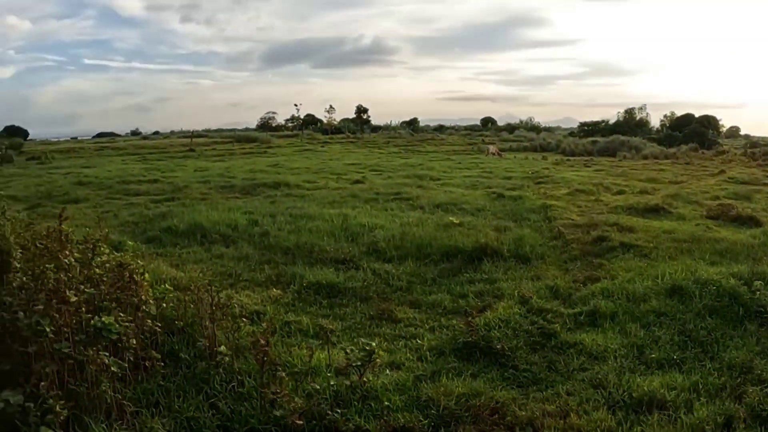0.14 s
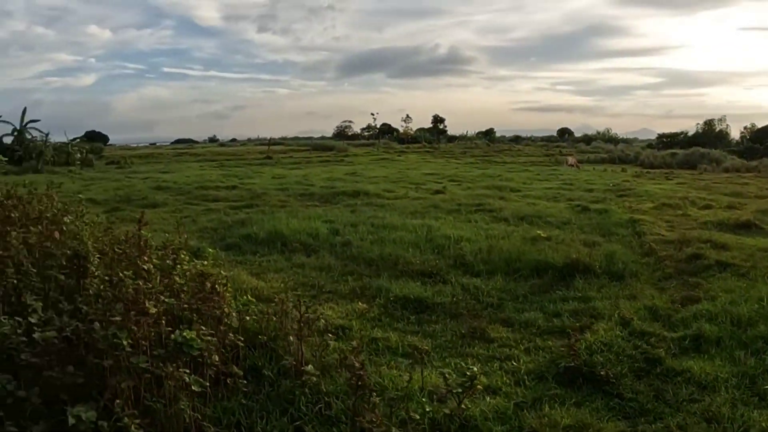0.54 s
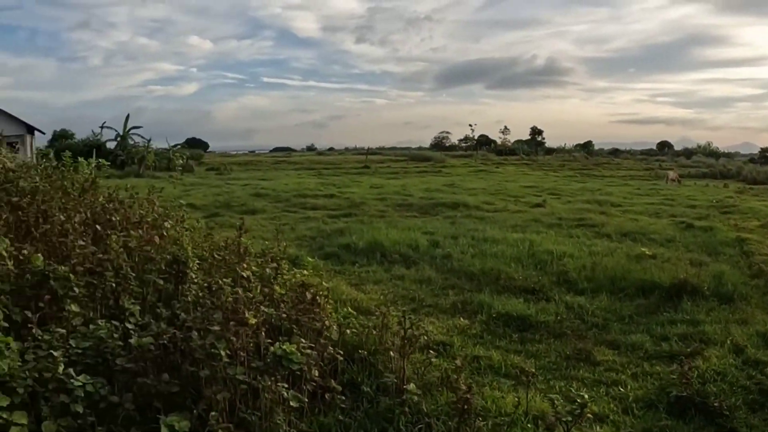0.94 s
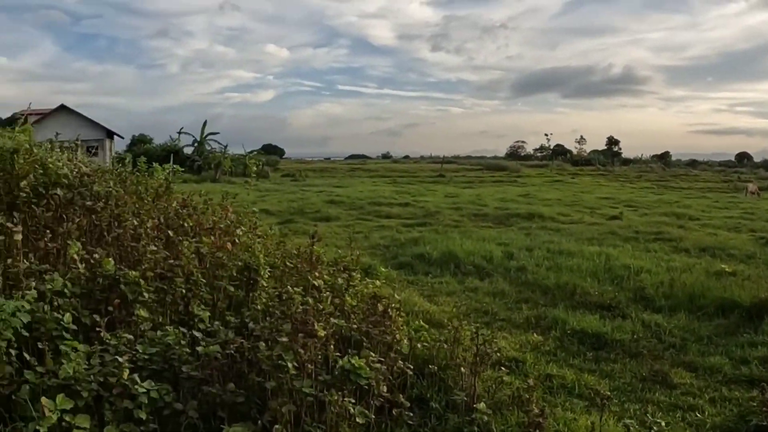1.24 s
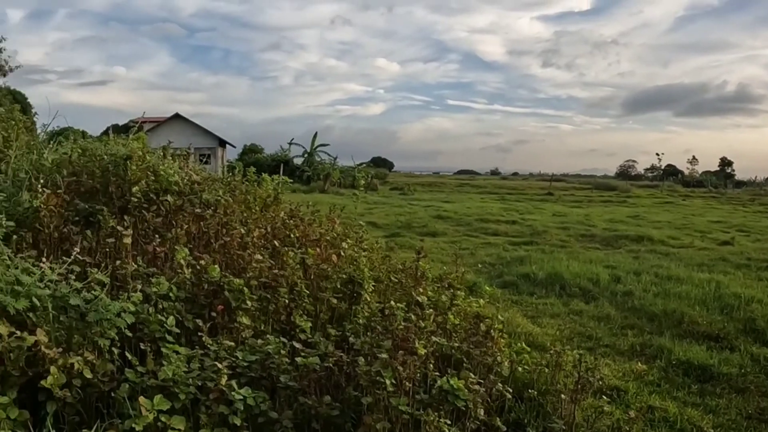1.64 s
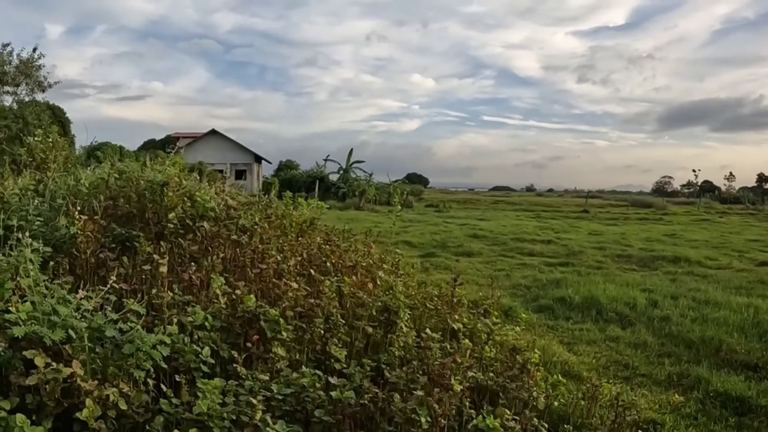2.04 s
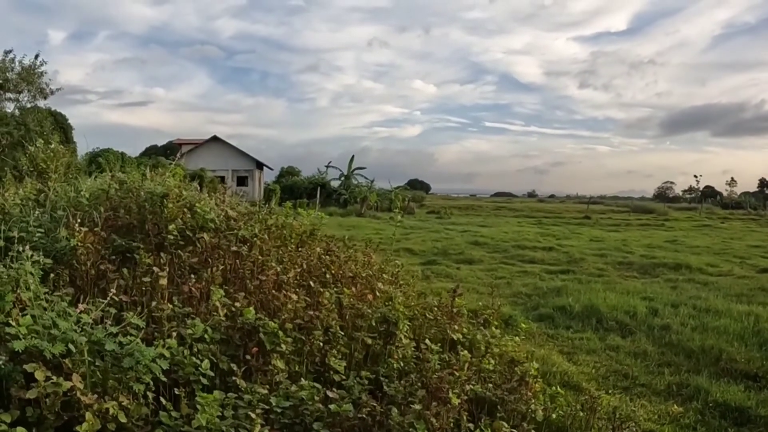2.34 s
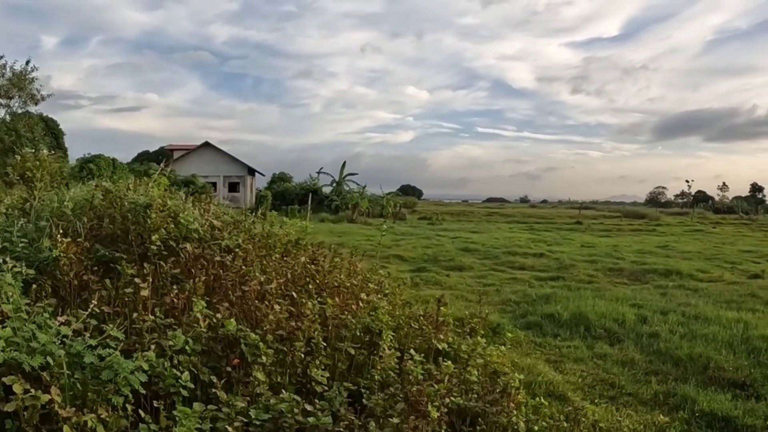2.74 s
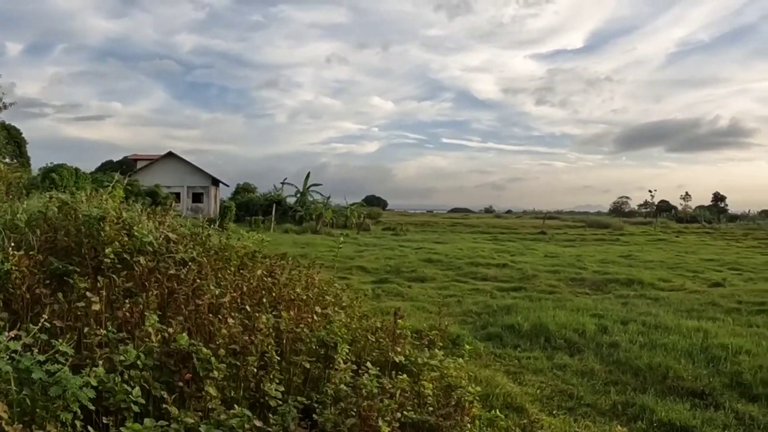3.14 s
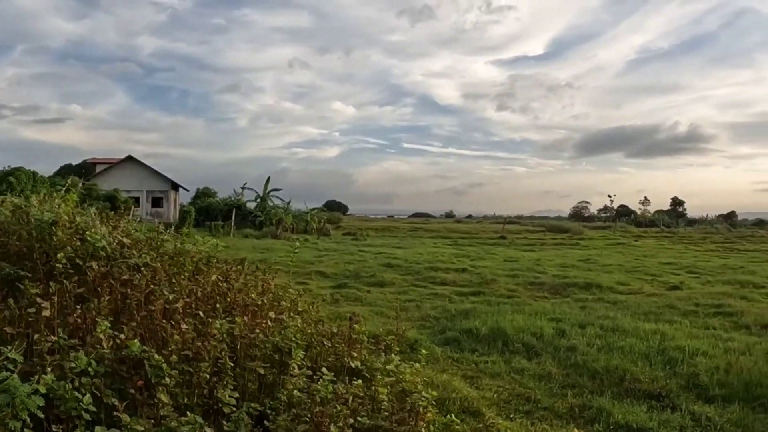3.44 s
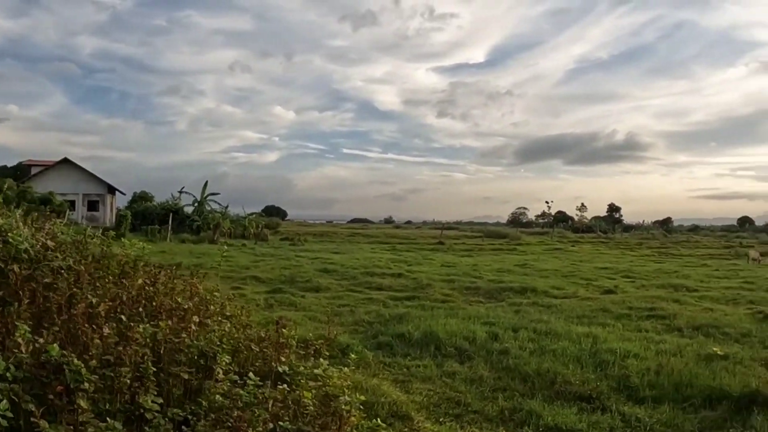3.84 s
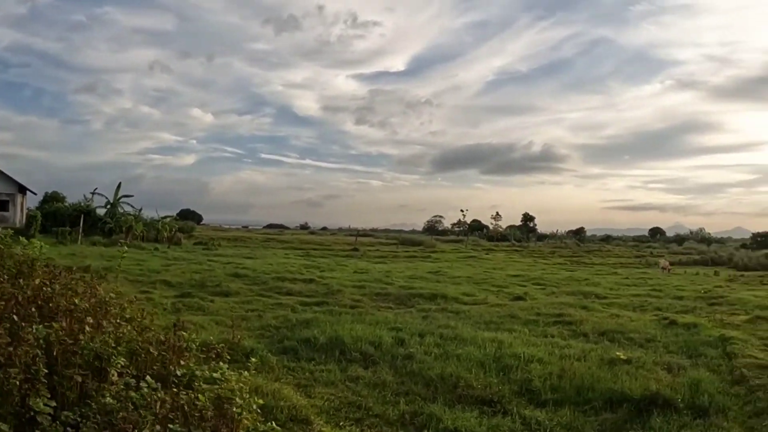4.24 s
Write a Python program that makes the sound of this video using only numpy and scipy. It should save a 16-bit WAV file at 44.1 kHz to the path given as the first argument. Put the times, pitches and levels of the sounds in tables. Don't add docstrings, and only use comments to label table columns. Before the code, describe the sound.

Two diesel engines drone low and rise slowly in pitch beyond a windy pasture, with crickets chirping and metallic knocks in the roar.

```python
import sys
import numpy as np
from scipy import signal
from scipy.io import wavfile
from scipy.ndimage import uniform_filter1d

SR = 44100
rng = np.random.default_rng(int(sys.argv[2]) if len(sys.argv) > 2 else 0)


def voltage_ratio(level):
    return 10 ** (np.asarray(level, float) / 20)


def dump(signal):
    limited = np.clip(np.atleast_2d(signal).T, -1, 1)
    pcm = np.round(limited * 32767).astype(np.int16)
    wavfile.write(sys.argv[1], SR, pcm)


N = 194128
T = np.arange(N) / SR

# [t/s, factor on port lead and unlikeness]
AWAY = [(0, 2.1), (.37, 2.55), (.8, 1.6), (1.2, 1.05), (1.7, 0.63), (2.7, 0.73), (3.0, 1.5), (3.9, 2.65),
        (4.4, 2.8)]
# [f/Hz, left-right likeness 0-1]
SAME = [(60, .99), (400, 0.93), (700, 0.82), (2000, .8), (3000, 0.68), (5000, 0.67), (8000, 0.51),
        (13500, .4)]
# [f/Hz, phase/rad]
LEAD = [(400, -0.062), (700, -.35), (1200, -0.48), (2000, -0.52), (2800, -0.57), (3900, .15), (5200, 0.14),
        (7900, 0.72), (10600, -0.16)]

# [f/Hz, level/dB]
AIR = [(3530, -25), (6000, -4.5), (6740, -10), (7880, -2), (9860, -5.5), (11100, -6), (13100, -10),
       (13600, -16), (13800, -24), (14000, -33)]
AIR_DB = -60.5

# [t/s, gust level/dB]
WIND = [(0, -52), (.5, -46), (.7, -50), (.85, -45), (1.1, -46), (2.0, -46), (2.5, -39.5), (3.0, -44.5),
        (4.4, -44)]
# [f/Hz, level/dB]
RUMBLE = [(15, -5), (30, -0.5), (70, -3), (110, -2.5), (160, -12.5), (250, -23), (400, -34), (600, -43)]
# [f/Hz, level/dB]
EDDIES = [(15, 4), (35, 4), (60, 1), (120, -15), (200, -23), (350, -30), (600, -50)]
EDDY_DB, EDDY_PER_GUST = -53, .3
# [t/s, level/dB, f/Hz, sign and share at the left port (right
POPS = [(.1707, -40, 130, 1), (.33, -39, 50, -1), (.4446, -38, 80, 1), (.53, -37, 50, -1),
        (.5846, -43, 90, 0.92), (1.111, -35, 150, 1), (1.93, -36, 25, -1), (2.05, -31, 18, 1),
        (2.153, -37, 70, -0.79), (2.48, -36, 28, -1), (2.6455, -40, 200, 1), (2.7397, -29, 420, 1),
        (2.7445, -29, 150, -1), (2.799, -37, 150, 1), (2.988, -35, 150, 1), (3.0, -33, 21, -1),
        (3.119, -27, 160, -1), (3.12, -33, 40, -1), (3.3, -30, 19, 1), (3.43, -35, 22, -1),
        (3.96, -36, 25, 1)]
# [t/s, f/Hz, level/dB]
MOAN = [(0, 170, -75), (.36, 165, -57), (.6, 190, -66), (.84, 215, -47), (1.0, 200, -54), (1.25, 200, -47),
        (1.45, 230, -60), (4.4, 230, -75)]

# [t/s, length/s, peak level/dB]
HIGH_CRICKET = [(.314, .14, -62), (.5, .14, -60), (.689, .19, -55), (.925, .05, -53), (1.019, .09, -53),
                (1.16, .19, -54), (1.398, .19, -56), (1.633, .19, -57), (1.918, .19, -57), (2.2, .19, -57),
                (2.433, .09, -58), (2.78, .05, -59), (2.861, .05, -56), (3.004, .19, -54),
                (3.286, .09, -57), (3.72, .09, -60), (3.853, .05, -57), (4.042, .09, -54),
                (4.187, .19, -56)]
LOW_CRICKET = [(.114, .14, -57), (.642, .09, -60), (1.267, .05, -56), (1.315, .05, -51), (1.459, .14, -49),
               (1.652, .05, -50), (1.748, .14, -48.5), (1.989, .19, -49.5), (2.23, .09, -50),
               (2.373, .14, -54), (2.705, .05, -53), (3.2, .14, -56), (3.427, .09, -60), (3.574, .09, -59),
               (4.19, .05, -56), (4.29, .14, -55)]
MID_CRICKET = [(.92, .05, -57), (1.07, .09, -57), (1.207, .19, -57), (2.62, .14, -59), (2.92, .05, -56),
               (3.02, .09, -57), (3.45, .14, -58), (3.73, .09, -58), (3.84, .19, -57)]
# [phrases, f/Hz, chirp period/s, left-right level/dB]
SINGERS = [
    (HIGH_CRICKET, 8410, .0472, 7),
    (LOW_CRICKET, 7860, .0479, 8),
    (MID_CRICKET, 8100, .0485, 6),
]
CHIRP_SPREAD_DB, CHIRP_SPREAD_HZ = 1.0, 15
# [t/s, level/dB]
CHORUS = [(0.0, -70), (0.83, -69), (1.19, -64), (1.49, -63.5), (1.75, -59.5), (2.56, -60.5), (2.81, -62.5),
          (3.92, -64.5), (4.4, -63.5)]

FAST_STROKES = 137.5
# [f/Hz, width/Hz, strokes per s, stroke depth 0-1, left-right level/dB, [t/s, level/dB]]
KATYDIDS = [
    (9550, 800, 190, .3, 2.7, [(0.0, -65), (0.248, -62), (0.75, -72)]),
    (10550, 650, FAST_STROKES, 0.82, 2.9, [(1.1, -84), (1.184, -69), (1.278, -74), (1.55, -67), (1.982, -62.5), (2.64, -64.5)]),
    (11010, 900, 140, 0.27, 7, [(0.0, -67), (0.86, -75), (0.99, -71), (1.56, -75), (1.59, -72), (3.3, -69), (4.4, -65)]),
]
# [t/s, f/Hz, level/dB]
SHRILL = [(0, 14300, -80), (.15, 14450, -79), (.4, 14200, -79), (.69, 14250, -79), (.74, 14300, -100),
          (4.4, 14300, -100)]

# [t/s, level/dB, squeak f/Hz, squeak level over grains/dB]
SCRAPE = [(.915, -60, 2600, -8), (.927, -47.5, 3300, -2), (.95, -52, 4800, -1), (.96, -56, 4700, -10),
          (.972, -48, 4950, 1), (.979, -49, 5900, -6), (.996, -48, 7000, -3), (1.0, -49, 5400, -12),
          (1.03, -50.5, 5200, -16), (1.055, -59, 5000, -14), (1.13, -61, 5300, -8)]
# [f/Hz, level/dB, t60/s, rise/s]
CLICK = [(845, -24, .03, .002), (865, -34, .15, .002), (760, -23, .025, .001), (1700, -31.5, .03, .001),
         (2240, -35, .01, .0003), (3990, -33, .009, .0002), (5200, -37, .008, .0002)]
CLICK_S = 3.1168
# [t/s, level/dB, f/Hz]
TICKS = [(.0197, -46, 3800), (0.0329, -28, 3250), (.0329, -35, 3950), (.0331, -41, 1900), (.034, -39, 3100),
         (.0521, -40, 4230), (.0553, -38, 1700), (.128, -47, 3530), (.925, -41, 5500)]
TICK_TURNS = 1.1

# [t/s, peak level/dB, ring f/Hz]
KNOCKS = [(0.702, -38, 1700), (.774, -38, 1500), (0.919, -31, 1700), (0.9699, -30, 2000),
          (1.329, -36, 1500), (1.438, -35, 1500), (1.592, -37, 1570), (1.678, -35, 1630),
          (1.7211, -28, 2300), (1.792, -27, 1930), (1.815, -35, 1530), (1.883, -35, 1520),
          (1.974, -32, 1500), (1.992, -35, 1850), (2.042, -36, 1780), (2.0823, -28, 1700),
          (2.135, -33, 1920), (2.154, -33, 2370), (2.176, -34, 1810), (2.222, -35, 1510),
          (2.2436, -29, 1820), (2.265, -33, 1520), (2.3328, -32, 1700), (2.351, -35, 1750),
          (2.399, -35, 2070), (2.4196, -28, 2220), (2.439, -34.5, 2170), (2.488, -35, 2170),
          (2.5314, -28.5, 2140), (2.616, -32, 2030), (2.705, -32, 1870), (2.729, -36, 1620),
          (2.859, -36, 1900), (2.9469, -31, 2410), (3.0282, -32, 2020), (3.1155, -35, 2200),
          (3.137, -32, 2450), (3.2217, -29, 2100), (3.328, -33, 2360), (3.4752, -29.5, 2620),
          (3.706, -30, 2020)]
KNOCK_PAN_DB = 1
# [t/s, f/Hz, level/dB]
PANEL = [(0, 1500, -80), (1.5, 1500, -66), (1.75, 1450, -54), (2.0, 1550, -53), (2.2, 1900, -58),
         (2.45, 2250, -52), (2.6, 2100, -56), (2.8, 2000, -72), (4.4, 2000, -80)]

# [t/s, level/dB, load/dB (how much harsher the block rattles)]
ROAR = [(0.0, -46.5, 2.5), (0.37, -45.5, -0.5), (1.04, -41.5, -2), (1.45, -42, -1), (1.75, -41, 0),
        (2.0, -41.5, 0.5), (2.38, -42.5, 4), (2.56, -45, 5.5), (2.76, -43.5, 2.5), (2.98, -44.5, 3.5),
        (3.3, -43.5, 3.5), (3.8, -44.5, 1.5), (4.4, -47.5, -2)]
# [f/Hz, level/dB per Hz]
BODY = [(150, -25), (260, -9), (345, -10), (423, -7), (497, -4), (600, -4), (730, -5.5), (944, -1.5),
        (1280, -4), (1590, -7.5), (2000, -13.5), (2600, -63), (4400, -120)]
BRIGHT = [(880, 1), (1500, -6.5), (2000, 2.5), (2830, -1), (4000, -10.5), (5200, -28), (8800, -120)]
FIZZ = [(2060, -23), (3500, -1), (5130, -2.5), (6520, -9.5), (7200, -7.5), (9360, -39), (15800, -120)]
BRIGHT_DB, BRIGHT_PER_LOAD, FIZZ_DB, FIZZ_PER_LOAD = -8, 1.04, -13.5, 0.94
# [f/Hz, level/dB per Hz]
THRUM = [(190, -8), (260, 0), (350, 0), (450, -1), (560, -1), (660, -9)]
# [t/s, level/dB]
THRUM_LEVEL = [(0, -53), (.5, -53), (.75, -58), (1.0, -56), (1.45, -52), (1.9, -51), (2.3, -52), (2.5, -50),
               (3.5, -49.5), (3.7, -55), (4.4, -54)]
# [t/s, f/Hz, level/dB]
BONNET = [(0, 1200, -60), (.5, 1350, -51), (.95, 950, -51), (1.25, 1120, -50), (1.6, 1130, -49),
          (1.9, 1150, -49), (2.2, 940, -51), (2.5, 1030, -56), (2.77, 970, -47.5), (2.95, 1000, -58),
          (3.7, 1150, -52), (4.4, 1050, -58)]
PAN_DB_PER_AWAY = 4
BLIND_HZ = 270

# [t/s, firing rate f/Hz, effort level/dB]
NEAR = [(0.0, 40.56, 0), (0.275, 41.28, 0), (0.55, 42.26, 2), (0.825, 42.24, -1), (1.1, 42.91, 0),
        (1.375, 43.36, 0.5), (1.65, 43.87, 0), (1.925, 44.42, 0), (2.2, 44.64, 0), (2.475, 45.26, 0),
        (2.75, 45.65, -1), (3.025, 46.45, 0), (3.3, 47.16, 0.5), (3.575, 47.48, 0), (3.85, 48.08, -1),
        (4.125, 48.49, -1), (4.4, 48.78, -2)]
# [multiple of firing rate, main order followed, level under it/dB]
NEAR_ORDERS = [(.5, 0, -26), (.75, 0, -18.5), (1.25, 0, -22), (1.5, 2, -8.5), (1.75, 0, -22),
               (2.25, 0, -45), (2.5, 0, -28), (2.75, 0, -23), (3.25, 2, -19), (4, 2, -18.5), (4.75, 2, -26),
               (5, 0, -34.5), (5.25, 2, -23.5)]
# [f/Hz, level/dB]
NEAR_PIPE = [(45, -24.5), (82, -25.5), (84.5, -26.5), (86, -31.5), (91, -34), (97.5, -44.5), (121, -38.5),
             (127, -40), (131, -36.5), (146, -44)]
# [t/s, firing rate f/Hz, effort level/dB]
FAR = [(0.0, 49.44, -8), (0.275, 54.37, -6), (0.55, 57.12, -5), (0.825, 56.51, -5), (1.1, 56.47, -2),
       (1.375, 57.8, -2), (1.65, 57.64, -4), (1.925, 58.16, -1), (2.2, 58.56, -1), (2.475, 58.93, -3),
       (2.75, 59.27, -2), (3.025, 59.65, -1), (3.3, 60.12, 0.5), (3.575, 60.65, 0), (3.85, 61.13, 0),
       (4.125, 61.59, -1), (4.4, 62.0, 0)]
# [multiple of firing rate, main order followed, level under it/dB]
FAR_ORDERS = [(.5, 0, -11.5), (1.5, 1, -4.5), (2.5, 1, -12), (3.5, 2, -11), (4, 2, -8), (4.5, 2, -14),
              (5, 2, -14.5), (5.5, 2, -17), (6, 2, -19), (6.5, 2, -19), (7, 2, -13), (8, 2, -17),
              (8.5, 2, -19), (9.5, 2, -16)]
# [f/Hz, level/dB]
FAR_PIPE = [(58, -34), (100, -46), (114.5, -46.5), (117, -33.5), (123, -31.5), (170, -55), (174, -46),
            (186, -45)]
OPENING_DB_PER_S, LEVEL_S = 3.5, 3.3
SHED_HZ, SHED_WIDTH_HZ, SHED_DB = 308, 4, 3.5
UNEVEN_LAG, UNEVEN_ORDER = 1.6, .9


def evened(x):
    return x / np.sqrt(np.mean(x ** 2) + 1e-20)


def read(points, hz):
    f, value = np.transpose(points)
    return np.interp(np.log(hz + 1), np.log(f + 1), value)


def curves(rows):
    s, *columns = np.transpose(rows)
    return [np.interp(T, s, c) for c in columns]


def panned(x, db):
    g = voltage_ratio(np.asarray(db) / 2)
    return x * np.array([g, 1 / g]).reshape(2, -1) * 2 / (g + 1 / g)


def add(mix, s, sound):
    part = mix[:, round(s * SR):][:, :sound.shape[1]]
    part += sound[:, :part.shape[1]]


def drift(hz):
    f, coarse = np.geomspace(hz / 8, hz, num=16)[:, None], T[::256]
    slow = (np.sin(2 * np.pi * (f * coarse + rng.random(f.shape))) / np.sqrt(f)).sum(0)
    return np.interp(T, coarse, evened(slow))


def resonate(x, hz, width_hz):
    turn = np.exp(2j * np.pi * np.cumsum(hz + 0 * x[0], -1) / SR)
    r = np.exp(-np.pi * width_hz / SR)
    return 2 * (turn * signal.lfilter([1 - r], [1, -r], x / turn)).real


def noise(spectrum, patchy_db, same=None, size=1024):
    frames, hz = 4 * N // size + 5, np.fft.rfftfreq(size, 1 / SR)
    a, b, c, d, patches = rng.standard_normal((frames, len(hz), 5), dtype=np.float32).T
    patches = uniform_filter1d(patches, size=10, axis=0)
    patches = evened(uniform_filter1d(patches, size=10, axis=1))
    away = np.interp(np.arange(frames) * size / 4 / SR, *np.transpose(AWAY))
    like = read(SAME, hz) if same is None else same + 0 * hz
    like = np.clip(like, 0, 1)[:, None] ** away
    lead = (read(LEAD, hz)[:, None] * away).astype(np.float32)
    left = a + 1j * b
    right = like * left * (np.cos(lead) - 1j * np.sin(lead)) + np.sqrt(1 - like ** 2) * (c + 1j * d)
    edges_db = -60 * ((hz < spectrum[0][0]) | (hz > spectrum[-1][0]))
    z = np.array([left, right]) * voltage_ratio((read(spectrum, hz) + edges_db)[:, None] + patchy_db * patches)
    x = signal.istft(z.astype(np.complex64), nperseg=size, noverlap=3 * size // 4)[1][:, :N]
    return x / np.sqrt(np.mean(x.mean(0) ** 2))


def whistle(rows, width_hz, spread):
    hz, db = curves(rows)
    source = rng.standard_normal((2, N))
    ring = resonate(source[0] + spread * source, hz, width_hz)
    return voltage_ratio(db) * evened(resonate(ring, hz, width_hz))


def air_hiss():
    return panned(voltage_ratio(AIR_DB) * noise(AIR, patchy_db=2.4), 5.9)


def wind():
    shared_db = curves(WIND)[0]
    port_db = EDDY_DB + EDDY_PER_GUST * (shared_db - shared_db.mean())
    out = voltage_ratio(shared_db + 6.0 + 0.77 * drift(10)) * noise(RUMBLE, patchy_db=0.3, same=1, size=4096)
    out += voltage_ratio(port_db + 4.8 * drift(30)) * noise(EDDIES, patchy_db=0.0, same=0, size=2048)
    out += whistle(MOAN, width_hz=45, spread=.08)
    for s, db, hz, port in POPS:
        u = T[:3000] * hz * 2 * np.pi - 3
        pop = voltage_ratio(db) * (1 - u ** 2) * np.exp(-u ** 2 / 2)
        add(out, s - 3 / (2 * np.pi * hz), pop * np.array([[port], [-port]]))
    return out


def crickets():
    out, t = np.zeros((2, N)), T[:1000]
    swell = signal.windows.tukey(len(t), .6)
    for phrases, pitch_hz, every_s, pan_db in SINGERS:
        chances = rng.standard_normal((len(phrases), 4, 2))
        for (s, length, db), chance in zip(phrases, chances):
            for k, (loud, sharp) in enumerate(chance[:round(length / every_s)]):
                hz = pitch_hz + CHIRP_SPREAD_HZ * sharp
                tone = np.sin(2 * np.pi * hz * t * (1.005 - 0.33 * t))
                chirp = voltage_ratio(db - 1.2 + CHIRP_SPREAD_DB * loud) * swell * tone
                add(out, s + k * every_s, panned(chirp, pan_db))
    band = [(7100, -26), (7550, 0.5), (7850, 1), (8150, -0.5), (8600, -12)]  # f/Hz, level/dB
    chorus = noise(band, patchy_db=0.7, same=0.31)
    return out + panned(voltage_ratio(curves(CHORUS)[0] - 2.2 + 1.3 * drift(22.04)) * chorus, 8.3)


def katydids():
    out = whistle(SHRILL, width_hz=350, spread=.8)
    for hz, width_hz, rate, depth, pan_db, rows in KATYDIDS:
        band = noise([(hz - width_hz, -18), (hz, 0), (hz + width_hz, -18)], patchy_db=1.0, same=1.0)
        beat = np.cos(2 * np.pi * rate * T + .4 * drift(4.8))
        strokes = evened(1 + np.clip(depth, 0, 1) * beat)
        singing = 1. * ((T >= rows[0][0]) & (T <= rows[-1][0]))
        singing = uniform_filter1d(singing, size=2000)
        out += panned(voltage_ratio(curves(rows)[0]) * singing * strokes * band, pan_db)
    return out


def scrape():
    span = slice(round(SCRAPE[0][0] * SR), round(SCRAPE[-1][0] * SR))
    db, hz, squeak_db = [c[span] for c in curves(SCRAPE)]
    slips = (rng.standard_normal((2, N)) * voltage_ratio(1.7 * rng.exponential(1, N)))[:, span]
    slips = slips[0] + .5 * slips
    band = signal.butter(4, [2800, 9800], "bandpass", fs=SR, output="sos")
    grains = evened(resonate(signal.sosfilt(band, slips), 5000, 4500))
    squeak = evened(resonate(resonate(slips, hz, 400), hz, 400))
    rub = grains + voltage_ratio(squeak_db) * squeak
    return panned(voltage_ratio(db + 1.2 * drift(55)[span]) * rub, 3.1)


def camera():
    out, t = np.zeros((2, N)), T[:4000]
    add(out, SCRAPE[0][0], scrape())
    click = np.zeros(len(t))
    for hz, peak_db, t60, rise in CLICK:
        swell = voltage_ratio(peak_db - 60 * t / t60) * (1 - np.exp(-t / rise))
        click -= swell * np.sin(2 * np.pi * hz * t)
    add(out, CLICK_S, click * np.array([[.3], [1.7]]))
    for s, db, hz in TICKS:
        u = t * hz / TICK_TURNS
        add(out, s, panned(voltage_ratio(db) * u * np.exp(1 - u) * np.sin(2 * np.pi * hz * t), 6))
    return out


def knocks():
    out, t = np.zeros((2, N)), T[:3000]
    for (s, db, hz), grit in zip(KNOCKS, rng.standard_normal((len(KNOCKS), 2, 3000))):
        clatter = (grit[0] + 0.93 * grit) * (1 - np.exp(-t / 0.0012)) * np.exp(-t / 0.013)
        ring = resonate(resonate(clatter, hz, 1200), hz, 1200)
        ring = ring + 0.26 * resonate(resonate(clatter, 4040, 2700), 3900, 1900)
        add(out, s - .001, panned(voltage_ratio(db - 6.5) * ring / abs(ring).max(), KNOCK_PAN_DB))
    return out


def rattle(turns):
    shake_db = 2.5 * np.cos(np.pi * (turns - .2))
    return panned(voltage_ratio(shake_db) * whistle(PANEL, width_hz=450, spread=.6), 4)


def roar(turns):
    body_db, load_db = curves(ROAR)
    bright_db = body_db + BRIGHT_DB + BRIGHT_PER_LOAD * load_db
    fizz_db = body_db + FIZZ_DB + FIZZ_PER_LOAD * load_db
    cycle = uniform_filter1d(np.exp(-((turns / 4 + 0.21) % 1) / 0.24), size=300) - .33
    firing, flicker = np.cos(2 * np.pi * (turns - .2)), drift(30)
    out = voltage_ratio(body_db - 1.5 + 2.9 * cycle + 0.97 * firing + 0.34 * flicker) * noise(BODY, patchy_db=1.07)
    out += voltage_ratio(bright_db + 3.9 * cycle + 1.0 * firing + 0.69 * flicker) * noise(BRIGHT, patchy_db=0.94)
    out += voltage_ratio(fizz_db + 4.8 * cycle + 0.75 * flicker) * noise(FIZZ, patchy_db=1.9)
    out += voltage_ratio(curves(THRUM_LEVEL)[0]) * noise(THRUM, patchy_db=2.0, same=.8)
    out += voltage_ratio(9.0 * cycle) * whistle(BONNET, width_hz=260, spread=.7)
    out = panned(out, PAN_DB_PER_AWAY * curves(AWAY)[0])
    directional = signal.butter(2, BLIND_HZ, "highpass", fs=SR, output="sos")
    across = signal.sosfiltfilt(directional, out[0] - out[1]) / 2
    return out.mean(0) + across * np.array([[1], [-1]])


def engine(rows, pipe, others, start, spread, unsteady_db, opening_db=0):
    hz, effort_db = curves(rows)
    main_db = [effort_db + read(pipe, k * hz) for k in (1, 2, 3)]
    turns = start + np.cumsum(hz) / SR
    out = np.zeros(N)
    for k, lead, under_db in [(1, 0, 0), (2, 1, 0.006), (3, 2, 0)] + others:
        waver = 1 - under_db / 8
        phase = 2 * np.pi * k * turns + spread * k * (k - 1) / 2
        phase += (k % 1 == .5) * UNEVEN_LAG * (k - UNEVEN_ORDER)
        phase += 0.031 * k * waver * drift(5)
        db = main_db[int(lead)] + under_db
        db = db + (3 < k < 7.5) * opening_db * (T - LEVEL_S)
        db += SHED_DB * np.exp(-((k * hz - SHED_HZ) / SHED_WIDTH_HZ) ** 2)
        db += unsteady_db * waver * drift(9)
        out += np.sqrt(2) * voltage_ratio(db) * np.cos(phase)
    return out, turns


def engines():
    near, turns = engine(NEAR, NEAR_PIPE, NEAR_ORDERS, 2.09, 2.15, unsteady_db=.7)
    far, _ = engine(FAR, FAR_PIPE, FAR_ORDERS, -.72, -1.6, unsteady_db=1.1, opening_db=OPENING_DB_PER_S)
    return panned(near + far, 0.48), turns


def scene():
    drone, turns = engines()
    background = air_hiss() + wind() + crickets() + katydids() + camera()
    return background + knocks() + rattle(turns) + roar(turns) + drone


def roll_off(x):
    return signal.sosfilt(signal.butter(12, 14460, fs=SR, output="sos"), x)


def record(dry):
    edge = signal.firwin(255, 15500, window=("kaiser", 5), fs=SR)
    return roll_off(signal.oaconvolve(dry, edge[None], "same"))


dry = scene()
out = record(dry)
dump(out)
```